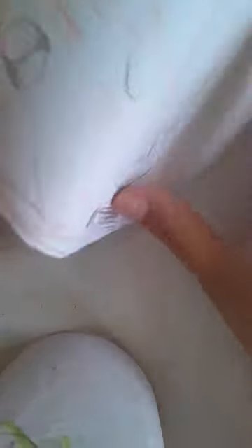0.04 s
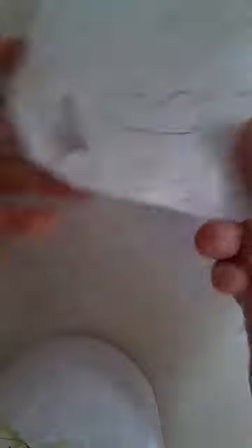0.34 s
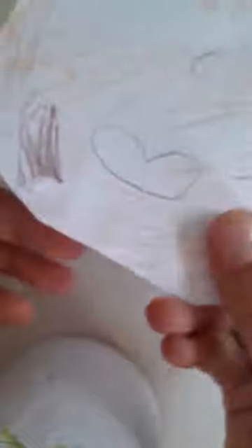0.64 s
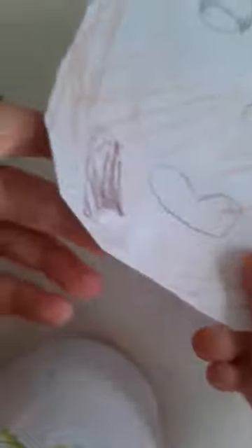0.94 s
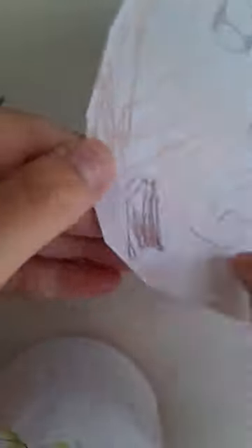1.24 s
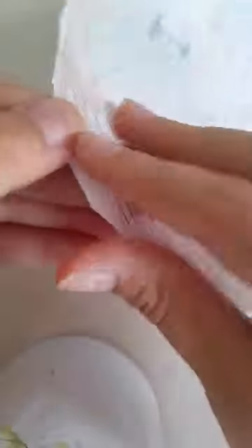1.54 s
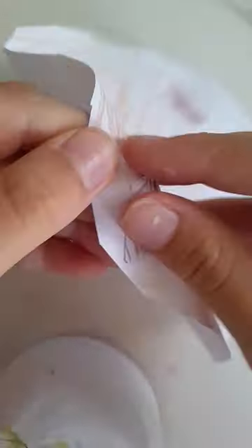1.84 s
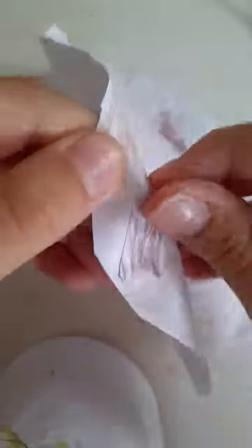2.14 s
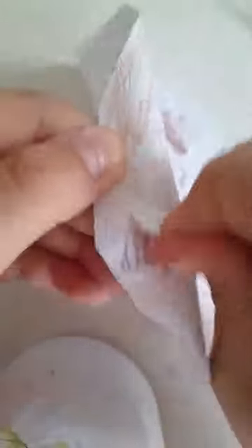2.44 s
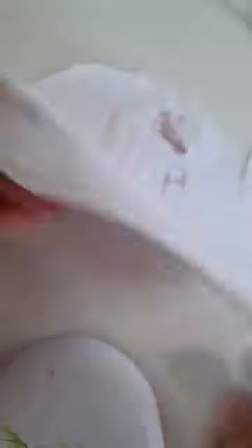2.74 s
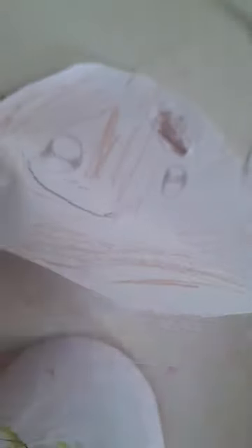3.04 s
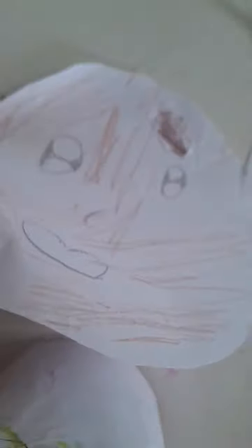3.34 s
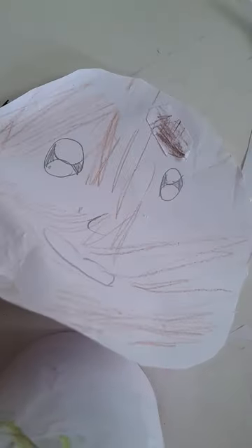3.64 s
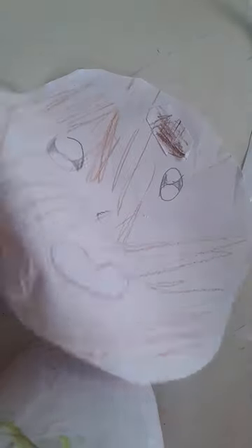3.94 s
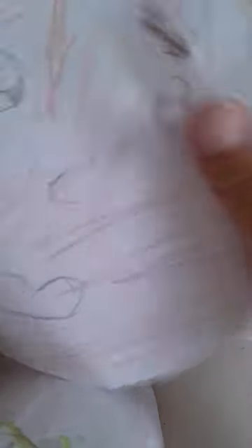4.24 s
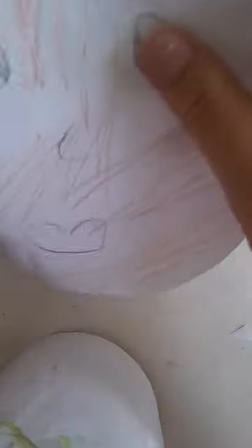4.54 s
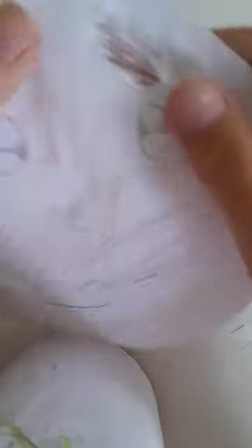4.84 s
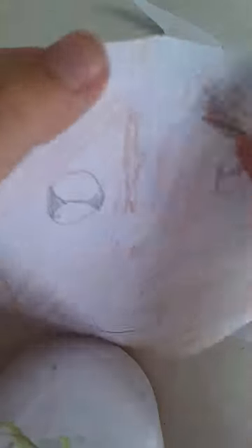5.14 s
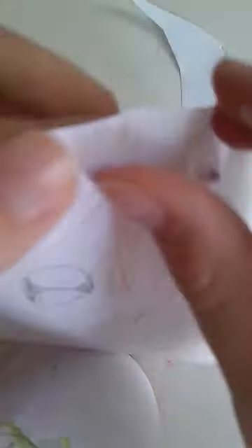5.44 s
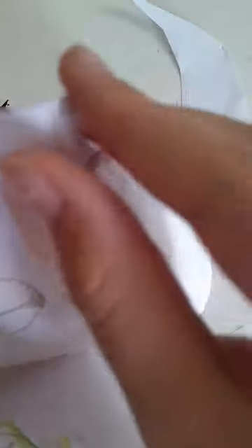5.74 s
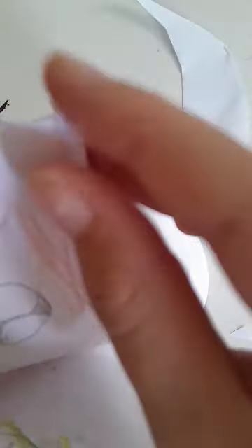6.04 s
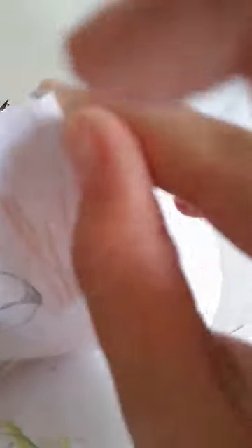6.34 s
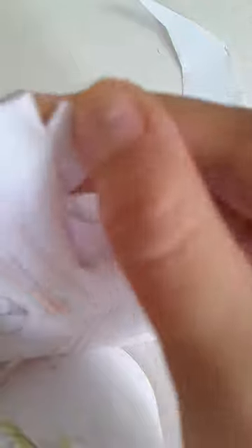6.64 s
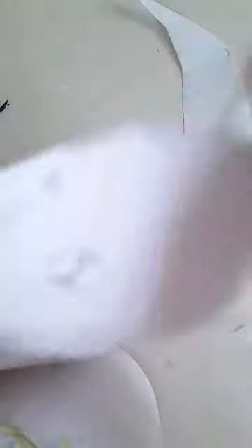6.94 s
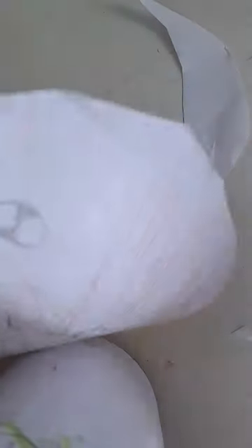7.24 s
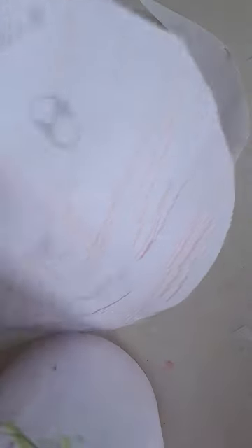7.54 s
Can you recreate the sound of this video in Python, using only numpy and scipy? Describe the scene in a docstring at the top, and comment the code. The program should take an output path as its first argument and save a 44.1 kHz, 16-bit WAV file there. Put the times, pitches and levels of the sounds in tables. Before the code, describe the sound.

A sheet of paper is handled and torn by hand, close to the microphone in a small room. It opens with a flurry of dry rustles, snaps and a small hollow pop, then goes nearly quiet from about 0.5 to 1.1 seconds. Softer rubbing and scattered crackles follow, building to a short, sharp rip at about 2.8 seconds. Only faint ticks and rustles remain until around 3.9 seconds, when a dense stretch of creasing and snapping begins, with a low puff of fanned air at 4.5 and a quick rip at 4.9. The handling eases off by 6 seconds. A hollow pop comes at 6.5 and another sharp rip at 7, followed by light rustles that fade just before 8 seconds. Soft puffs of air accompany the moving sheet, and a faint electrical hum and hiss lie underneath throughout.

```python
"""A dry rustle and a flurry of snaps, close up: drawing paper is turned, creased and torn by hand over
a table in a small room. Fingers and paper edges drag over the fibres in strokes, the fastest of them
short rips. The sheet buckles with snaps and two hollow pops, and fans soft puffs of air at the
microphone. A faint mains hum and hiss lie underneath."""
import sys
import numpy as np
from scipy import signal
from scipy.fft import rfft, irfft
from scipy.io import wavfile
from scipy.ndimage import uniform_filter1d

SR = 44100
rng = np.random.default_rng(int(sys.argv[2]) if len(sys.argv) > 2 else 0)


def dump(signal):
    """Clip the signal to [-1, 1] and save it as 16-bit WAV at the path in sys.argv[1]."""
    limited = np.clip(np.atleast_2d(signal).T, -1, 1)
    pcm = np.round(limited * 32767).astype(np.int16)
    wavfile.write(sys.argv[1], SR, pcm)


N = 343980
TAPS = 4096
TIME = np.arange(N) / SR
HZ = np.maximum(np.arange(TAPS // 2 + 1) * SR / TAPS, 1)

# Tone curves. Each row: frequency in Hz, relative gain in dB.
FLOOR_EQ = [(12, -32.5), (25, -20.5), (45, 4.5), (90, -11.5), (170, -14.5), (300, -21), (650, -22.5),
            (1200, -30), (4000, -30), (9000, -43), (15000, -32.5)]  # room rumble and microphone hiss
WALL_EQ = [(60, -5.5), (300, 4), (1400, -5), (3000, 1), (6000, -8), (15000, -7.5)]  # what the walls give back
PUFF_EQ = [(12, -40.5), (25, -18), (38, -1), (60, -4), (95, 1), (150, -8), (250, -14.5), (500, -24),
           (1500, -76.5)]  # fanned air
FIBRE_EQ = [(900, -17.5), (2000, -4.5), (3200, -2.5), (5200, -1.5), (7500, -2.5), (10000, -3.5),
            (13500, -2.5), (16000, -7)]  # the hiss of slipping fibres
SLACK_BODY_EQ = [(60, -18.5), (240, 3.5), (480, -5.5), (660, 2), (880, -8.5), (1450, 2), (2100, -13),
                 (2600, -6), (4000, -16.5), (7000, -31.5)]  # the sheet hanging loose
TAUT_BODY_EQ = [(60, -17.5), (200, -9), (350, -4.5), (500, -10), (700, -3.5), (1500, -1.5), (2100, 8.5),
                (3000, -3.5), (4200, -7), (7000, -15)]  # the sheet under a stroke
# The mains hum. Each row: frequency in Hz, rms level in dB.
HUM_PARTIALS = [(119.8, -75), (239.6, -89)]
# The microphone's two ports hear the paper differently. Each row: frequency in Hz, left over right in dB.
PORT_BALANCE = [(150, 0.5), (480, -9.5), (1000, -2.5), (2000, 0.5), (4000, 1.5), (8000, -0.5), (13000, -3)]
# Steady peaks and a dip colouring the paper sounds. Each row: centre in Hz, width in Hz, gain in dB.
FIXED_COLOUR = [(640, 31, 5.5), (1065, 510, 5), (1504, 390, 9.5), (2070, 280, -8.5), (2480, 220, 3.5)]
# The sheet swings and fans air. Each row: peak time in seconds, fall in seconds, level in dB.
SWINGS = [(0.126, 0.036, -37.5), (0.213, 0.05, -38.5), (0.33, 0.04, -40.5), (0.384, 0.097, -43.5),
          (0.86, 0.066, -60), (1.234, 0.11, -45.5), (1.455, 0.23, -53.5), (1.76, 0.057, -59),
          (2.3, 0.11, -59), (2.623, 0.039, -46.5), (2.8, 0.13, -52.5), (4.0, 0.049, -56),
          (4.21, 0.019, -53.5), (4.284, 0.17, -42.5), (4.541, 0.051, -29.5), (4.76, 0.055, -41),
          (4.89, 0.12, -43), (5.06, 0.2, -54), (5.24, 0.074, -50), (5.34, 0.05, -45), (5.58, 0.091, -51),
          (5.815, 0.054, -51), (7.001, 0.14, -50), (7.631, 0.082, -49.5)]
# Fingers hold and shift the sheet. Each row: start and end in seconds, hiss level in dB,
# body over hiss in dB.
FINGER_HOLDS = [(0.0, 0.387, -55.5, -9.5), (1.11, 1.333, -72, -5), (1.459, 1.982, -67.5, -4.5),
                (2.052, 2.878, -65.5, -12), (3.286, 3.36, -70.5, -5.5), (3.54, 3.736, -83, 0),
                (3.953, 4.58, -62, -7), (4.742, 5.859, -66.5, -0.5), (6.014, 6.686, -72, -5.5),
                (6.94, 7.243, -64.5, -6), (7.565, 7.796, -74.5, -2)]
# A bulge flips through. Each row: start in seconds, starting level of each mode in dB,
# lower mode in Hz, pan in dB (left over right).
BULGE_POPS = [(0.0677, -34, 1950, 13), (6.5335, -22.5, 1103, 14.5)]
# The sheet buckles or is tapped. Each row: start in seconds, 60 dB decay in seconds, low, middle and
# top levels in dB (as if the energy were packed into 1 ms), ring in Hz, pan in dB (left over right).
BUCKLES = [(0.0663, 0.011, -50.5, -24, -52, 2150, -1.5), (0.113, 0.091, -43, -33, -49, 790, 3.5),
           (0.1676, 0.076, -32.5, -43, -49, 1050, 10), (0.1863, 0.026, -39, -33.5, -29, 1350, 10),
           (0.2448, 0.032, -42, -67, -38, 900, 16), (0.3063, .04, -32.5, -40, -39, 1030, 22),
           (0.3297, 0.013, -33, -32.5, -26.5, 3130, 17), (0.3763, 0.011, -24, -27, -32.5, 1290, 19),
           (0.392, 0.023, -44, -38, -44, 705, 15), (0.4218, 0.04, -32.5, -37.5, -55, 1580, 16),
           (0.817, 0.063, -38.5, -56, -93, 840, 23), (1.1258, 0.054, -39.5, -43, -77, 1430, 23),
           (1.1724, 0.032, -60, -57, -81, 1480, 20), (1.2258, 0.066, -45.5, -40.5, -57, 396, 10),
           (1.4405, 0.023, -34.5, -38, -43, 1400, 6), (1.4452, 0.038, -34.5, -28, -36.5, 1360, 12),
           (1.4882, 0.18, -38.5, -40, -34.5, 1350, 12), (1.7034, 0.078, -65, -41, -30, 2900, 19),
           (1.723, 0.038, -46, -31.5, -49, 795, 15), (1.859, .021, -51, -38.5, -48.5, 3420, 8),
           (2.055, 0.15, -42, -44, -31.5, 387, 2.5), (2.1137, 0.032, -39, -22, -26, 352, 2.5),
           (2.1207, 0.036, -32.5, -29, -25, 1610, -1.5), (2.409, 0.0045, -45, -70, -62, 350, -10),
           (2.7818, 0.025, -35, -24, -12, 3040, 14), (2.797, 0.031, -28, -33, -15, 5470, 1),
           (2.8028, .013, -41, -24, -22.5, 5660, 17), (2.8807, 0.023, -45.5, -31, -40.5, 1320, -5),
           (2.9777, 0.026, -51.5, -40.5, -61.5, 1520, 1), (3.285, 0.049, -54.5, -43, -50.5, 2610, 3),
           (3.556, 0.1, -47.5, -51, -75.5, 620, 4), (3.5836, 0.033, -66, -78, -49.5, 680, 7.5),
           (3.6382, 0.076, -53.5, -52, -85, 594, 3), (3.7289, 0.16, -53, -50, -87.5, 600, 1.5),
           (3.82, 0.11, -64.5, -59.5, -80, 622, -4.5), (4.0822, 0.019, -36, -28, -24, 2200, 8),
           (4.189, 0.023, -41, -30.5, -21, 1430, 16), (4.201, 0.014, -57, -30, -25.5, 1440, -2),
           (4.2399, .068, -35, -28, -21, 1580, 5.5), (4.256, 0.071, -55, -29, -24, 4600, 4),
           (4.3174, 0.077, -30, -31, -39, 1280, 23), (4.334, 0.039, -34, -30, -26.5, 613, 6),
           (4.4326, 0.02, -35.5, -45, -38.5, 1510, 18), (4.483, 0.076, -41, -48, -43, 2420, 10),
           (4.5064, 0.02, -34, -37.5, -33.5, 352, 17), (4.532, 0.075, -21.5, -29.5, -26.5, 1640, 7.5),
           (4.5393, 0.051, -41, -28, -43, 1600, 11), (4.6978, 0.064, -47, -57, -50.5, 640, 5.5),
           (4.7478, 0.048, -28.5, -37.5, -36.5, 1850, 4), (4.7984, 0.08, -35.5, -37.5, -32.5, 1450, 5),
           (4.8505, .022, -43, -34, -31.5, 1320, 8), (4.895, 0.098, -41, -22, -18.5, 2550, 14.5),
           (4.909, 0.084, -49, -20.5, -24.5, 3700, 2), (5.0436, .036, -32, -36, -33.5, 1450, 10),
           (5.17, 0.08, -41, -47, -40, 1720, 7), (5.2484, 0.006, -57, -51.5, -41.5, 340, 10),
           (5.294, 0.033, -45, -49, -80, 1440, 9), (5.339, 0.042, -43, -49, -36.5, 1520, 9),
           (5.3566, .038, -35, -28, -43, 1310, 3), (5.6016, 0.028, -33.5, -38.5, -36.5, 650, 7.5),
           (5.6757, 0.021, -40.5, -36.5, -55, 1480, 2.5), (5.7487, 0.057, -30, -38, -42, 1456, 10),
           (5.8026, .059, -42, -45.5, -59, 1390, 16), (6.0481, 0.075, -52, -55, -44, 490, 6),
           (6.159, 0.078, -54, -50.5, -35.5, 1544, 5), (6.3526, 0.057, -72.5, -89, -41, 1320, 4),
           (6.5319, .019, -30.5, -25.5, -28, 1265, 10), (6.8829, .023, -60, -52.5, -47.5, 600, 6.5),
           (6.984, 0.0092, -21.5, -20, -12, 1680, 5), (7.1103, 0.026, -44, -26.5, -42, 1500, -3.5),
           (7.5237, 0.02, -53, -54, -88, 774, 8), (7.632, 0.032, -43, -32, -49, 1400, 7)]
# Slides and rips. Each row: fastest moment, rise and fall in seconds, hiss level in dB,
# body over hiss in dB, ring of the stretched paper in Hz, pan in dB (left over right).
SLIDES_AND_RIPS = [(0.01, 0.041, 0.058, -42.5, -13, 1700, 5.5), (0.085, 0.02, .022, -46, 8, 1200, 4),
                   (0.103, 0.055, 0.019, -35, -31, 4100, 3.5), (0.174, 0.023, .044, -45.5, 0, 1040, 2.5),
                   (0.205, .02, 0.017, -43.5, 1, 1280, 6), (0.294, 0.02, 0.015, -45, -3.5, 1030, 16),
                   (0.327, 0.019, .02, -41, -10, 3140, 8), (0.373, 0.05, 0.023, -49.5, -1, 1360, 1),
                   (1.231, 0.012, 0.088, -53, 0, 1520, 6.5), (1.499, 0.058, 0.043, -67, 11, 1420, -7),
                   (1.604, 0.054, 0.022, -49.5, -5, 1080, 6), (1.727, 0.056, 0.062, -41, -11, 1140, 2.5),
                   (1.805, 0.017, .052, -47, -7.5, 2700, 3), (1.942, 0.058, 0.051, -45.5, -3.5, 3400, 0),
                   (2.067, 0.055, 0.12, -53.5, -8.5, 3940, 5), (2.27, 0.16, 0.075, -56.5, -1, 1500, -1.5),
                   (2.385, 0.04, 0.087, -50, -10, 4180, 4), (2.595, 0.032, 0.078, -40, -10.5, 5830, 5),
                   (2.63, 0.054, 0.074, -42, -10, 5725, 3.5), (2.769, 0.052, 0.068, -34.5, -9, 2860, 5),
                   (2.787, 0.013, .029, -24, -10, 2940, 1), (3.929, 0.015, 0.12, -51, 1.5, 1600, -1),
                   (4.009, 0.055, 0.084, -42, -3, 1630, 3), (4.159, 0.096, 0.1, -45.5, 7, 1520, 4),
                   (4.277, 0.025, 0.014, -33.5, 2, 1410, 8), (4.338, 0.045, 0.045, -49, 12, 1320, 5.5),
                   (4.4, 0.033, 0.032, -49.5, 3.5, 1450, 3.5), (4.432, 0.016, .011, -43, -4, 1520, 5),
                   (4.54, 0.031, 0.022, -43, 5.5, 1640, 0.5), (4.775, .006, 0.018, -41, -8, 1330, 2),
                   (4.906, 0.027, 0.049, -28, -8, 2980, 6.5), (4.976, 0.015, 0.022, -33.5, -17, 4600, 5.5),
                   (5.057, 0.066, 0.15, -48.5, -10, 1470, 6), (5.5, .061, 0.092, -55.5, 9.5, 1440, 2.5),
                   (5.551, 0.053, 0.043, -49, 4.5, 1080, 3), (5.81, 0.097, 0.08, -60, 4, 1400, 4),
                   (6.168, 0.036, 0.095, -60.5, 6.5, 1520, 5), (6.411, 0.056, 0.028, -74.5, 9.5, 1540, 21),
                   (6.505, 0.013, 0.035, -52, -9, 1610, 3), (6.63, 0.18, 0.11, -68.5, 10, 1450, 4),
                   (6.961, 0.042, 0.046, -22, -10, 5030, 3.5), (6.981, .022, 0.031, -34, 8.5, 1660, -1.5),
                   (7.102, 0.036, 0.018, -46.5, -1.5, 1530, 2), (7.23, 0.13, 0.038, -58.5, -4.5, 1510, -4),
                   (7.496, 0.038, 0.046, -62.5, -9.5, 1420, 0.5),
                   (7.59, 0.025, 0.041, -47.5, -17, 3700, 2.5), (7.63, 0.028, 0.023, -42.5, -10.5, 1440, 3),
                   (7.691, 0.1, .14, -56.5, -7, 1330, 3)]

LEFT_LEAD_S = 0.00025  # direct sound reaches the left port first


def from_db(db):
    """Decibels to gain."""
    return 10 ** (np.asarray(db) / 20)


def unit_rms(x):
    """Scale to rms 1."""
    return x / np.sqrt(np.mean(x ** 2) + 1e-20)


def curve_db(points):
    """An EQ curve in dB, its points joined on a log-frequency axis."""
    hz, db = np.transpose(points)
    return np.interp(np.log(HZ), np.log(hz), db)


def equalise(x, db):
    """Minimum-phase EQ with the given gain at each frequency."""
    cepstrum = irfft(np.log(from_db(db)))
    cepstrum[1:TAPS // 2] *= 2
    cepstrum[TAPS // 2 + 1:] = 0
    impulse = irfft(np.exp(rfft(cepstrum)))
    return signal.fftconvolve(x, impulse[None], axes=1)[:, :x.shape[1]]


def drift(per_s, size):
    """A random wobble with a spread near 1."""
    knots = rng.standard_normal(size // 8 + 2)
    return np.interp(np.arange(size) * per_s / SR, np.arange(len(knots)), knots)


def swell_db(t, rise, fall):
    """A gesture's envelope: it peaks at t = 0 and is 20 dB down at its rise and fall times."""
    return -20 * np.abs(t / np.where(t < 0, rise, fall)) ** 1.36


def mix_in(out, start_s, sound):
    """Lay a sound on the track at its cue."""
    start = round(start_s * SR)
    low, high = max(start, 0), min(start + sound.shape[1], N)
    out[:, low:high] += sound[:, low - start:high - start]


def panned(x, pan_db):
    """Constant-power pan; positive leans left."""
    return x * unit_rms(from_db([[pan_db / 2], [-pan_db / 2]]))


def two_ports(direct, scattered, direct_share):
    """Stereo image: direct sound reaches the right port late; scattered sound differs at each port."""
    samples = np.arange(len(direct))
    lag = np.round(LEFT_LEAD_S * SR + rng.normal(0, 1.4))
    late = np.interp(samples - lag, samples, direct, left=0)
    return np.sqrt(direct_share) * np.array([direct, late]) + np.sqrt(1 - direct_share) * scattered


def background(floor_db=-71):
    """The bed: quiet room rumble, microphone hiss and a slightly wavering mains hum."""
    noise = rng.standard_normal((3, N))
    floor = from_db(floor_db) * unit_rms(equalise(noise[0] + 4.5 * noise[1:], curve_db(FLOOR_EQ)))
    hum = np.zeros(N)
    for hz, db in HUM_PARTIALS:
        amplitude = np.sqrt(2) * from_db(db + 1.5 * drift(5, N))
        hum += amplitude * np.sin(2 * np.pi * hz * TIME + 0.3 * drift(2, N))
    return floor + panned(hum, pan_db=3.5)


def room(x, early_t60_s=0.1, tail_t60_s=0.34, return_db=-12.5):
    """Small-room reverb: a quick wash of reflections from table and walls, then a short tail."""
    t = np.arange(SR) / SR
    decay = from_db(-60 * t / tail_t60_s) + 2.9 * from_db(-60 * t / early_t60_s)
    reflections = unit_rms(rng.standard_normal((2, SR)) * decay * (t > 0.006)) / np.sqrt(SR)
    impulse = equalise(reflections, curve_db(WALL_EQ))
    send = x + 0.41 * x[::-1]  # each side bleeds into the other
    return from_db(return_db) * signal.fftconvolve(send, impulse, axes=1)[:, :N]


def fanned_air(rubbing_db, sway_db=-3, rise_s=0.038):
    """The held sheet stirs the air, and each swing pushes a soft low puff, mostly at the left port."""
    noise = rng.standard_normal((3, N))
    wind = equalise(noise[0] + 0.85 * noise[1:], curve_db(PUFF_EQ))
    wind /= np.sqrt(uniform_filter1d(np.mean(wind ** 2, axis=0), size=2000) + 1e-9)  # even out its level
    power = from_db(rubbing_db + sway_db)[None] ** 2
    t = np.arange(-SR // 5, SR // 2) / SR
    for peak_s, fall_s, db in SWINGS:
        puff = from_db(db + swell_db(t, rise_s, fall_s))
        mix_in(power, peak_s + t[0], puff[None] ** 2)
    return panned(wind * np.sqrt(power), pan_db=8.0)


def fixed_colour_eq():
    """Steady peaks and a dip that colour the paper sounds, strongest near 1.5 kHz, in dB."""
    return sum(db / (1 + (2 * (HZ - hz) / width) ** 2) for hz, width, db in FIXED_COLOUR)


def grip_eq(ring_hz, ring_db):
    """The broad ring of the gripped patch of paper, in dB, with small peaks that change at every bend."""
    ring = ring_db / (1 + (np.log2(HZ / ring_hz) / 0.3) ** 2)
    ripple_hz = np.geomspace(150, 17000, 110)
    ripple = 1.6 * np.interp(HZ, ripple_hz, rng.standard_normal(len(ripple_hz)))
    return ring + ripple


def fibre_slips(size, per_s, spread_db, smooth):
    """Fibres catch and let go: tiny clicks of uneven size over a smooth rub."""
    strengths = from_db(spread_db * np.minimum(rng.exponential(1, (3, size)), 4))
    signs = rng.choice([-1, 1], (3, size))
    clicks = unit_rms(strengths * signs * (rng.random((3, size)) < per_s / SR))
    return unit_rms(clicks + smooth * rng.standard_normal((3, size)))


def friction(slips, hiss_db, body_db, body_eq, grip_db, judder_db):
    """Slips hiss directly and shake the body of the sheet; the contact judders as it moves."""
    size = slips.shape[1]
    slips = slips * from_db(judder_db * (drift(200, size) + drift(700, size)))
    hiss = two_ports(slips[0], slips[1:], direct_share=0.13)
    hiss = equalise(hiss, curve_db(FIBRE_EQ) + grip_db)
    body = two_ports(slips[0], slips[1:], direct_share=0.62)
    body = equalise(body, curve_db(body_eq) + fixed_colour_eq() + grip_db)
    return from_db(hiss_db) * (unit_rms(hiss) + from_db(body_db) * unit_rms(body))


def hold_envelopes(resting_db=-81.5, grab_s=0.035, let_go_s=0.057):
    """Rubbing level and body over rubbing, in dB; each hold fades 20 dB per grab or let-go time."""
    hiss = body = from_db(resting_db)
    for start, end, hiss_db, body_db in FINGER_HOLDS:
        fade = np.maximum(start - TIME, 0) / grab_s + np.maximum(TIME - end, 0) / let_go_s
        level = from_db(hiss_db - 20 * np.minimum(fade, 10))
        hiss = hiss + level
        body = body + level * from_db(body_db)
    return 20 * np.log10(hiss), 20 * np.log10(body / hiss)


def rustle(hiss_db, body_db):
    """The slack sheet creeps softly under the fingers, with sparser slips than in a stroke."""
    creep = from_db(1.5 * drift(25, N))
    slips = creep * fibre_slips(N, per_s=1500, spread_db=1.0, smooth=1.0)
    rub = friction(slips, hiss_db, body_db, SLACK_BODY_EQ, grip_db=0, judder_db=1.2)
    return panned(rub, pan_db=3.5)


def pops(upper_ratio=1.17, t60_s=0.013):
    """A bulge flips through with a hollow knock, ringing for a moment in two close modes."""
    out = np.zeros((2, N))
    t = np.maximum(np.arange(TAPS) / SR - [[0], [LEFT_LEAD_S]], 0)
    for start, db, hz, pan_db in BULGE_POPS:
        modes = np.sin(2 * np.pi * hz * t) + np.sin(2 * np.pi * hz * upper_ratio * t)
        mix_in(out, start, panned(modes * from_db(db - 60 * t / t60_s), pan_db))
    return out


def snap(t60_s, levels_db, grip_db):
    """A buckle gives a crack of a few milliseconds, then bending waves scatter across the sheet."""
    t = np.arange(TAPS) / SR
    noise = rng.standard_normal((3, TAPS))
    dark = signal.sosfilt(signal.butter(1, 2500, fs=SR, output="sos"), noise)
    bright = noise - dark
    crack = rng.standard_normal(TAPS) * np.exp(-np.abs(t - 0.002) / 0.00057)
    waves = dark * from_db(-60 * t / t60_s) + bright * from_db(-60 * t / (1.1 * t60_s))
    scatter = unit_rms(waves * (1 - np.exp(-t / 0.0013)))
    stereo = two_ports(unit_rms(crack) + scatter[0], 1.54 * scatter[1:], direct_share=0.63)
    low, middle, top = levels_db - 10 * np.log10([900, 2800, 11500])  # spread over band widths in Hz
    sheen = top - 6.5 + 0.35 * min(top - middle, 0)
    tone = [(30, low - 25), (180, low - 1.5), (650, low), (2100, middle), (6500, top), (16000, sheen)]
    sound = equalise(stereo, curve_db(tone) + fixed_colour_eq() / 2 + grip_db)
    energy = np.sum(from_db(levels_db) ** 2) * SR / 1000
    return unit_rms(sound) * np.sqrt(energy / TAPS)


def snaps(cues):
    """Dry buckles and taps, each with its own ring and pan; cues are laid out like BUCKLES."""
    out = np.zeros((2, N))
    for start, t60_s, *levels_db, ring_hz, pan_db in cues:
        sound = snap(t60_s, np.array(levels_db), grip_eq(ring_hz, ring_db=8.0))
        mix_in(out, start, panned(sound, pan_db))
    return out


def crinkles(per_s=3.1, over_rub_db=13, spread_db=6.5, t60_s=0.021, ring_hz=1400, pan_db=5):
    """Tiny buckles sprinkled at random through each hold, louder where the rubbing is louder."""
    cues = []
    for start, end, hiss_db, body_db in FINGER_HOLDS:
        typical_db = hiss_db + over_rub_db + np.array([body_db, body_db, 0])
        for at_s in rng.uniform(start, end, round((end - start) * per_s)):
            levels_db = typical_db + spread_db * rng.standard_normal(3)
            cues.append((at_s, t60_s, *levels_db, ring_hz, pan_db))
    return snaps(cues)


def strokes():
    """Slides and rips: a dense spray of fibre slips swells to the fastest moment and dies away."""
    out = np.zeros((2, N))
    t = np.arange(-SR // 5, SR // 4) / SR
    for peak_s, rise_s, fall_s, hiss_db, body_db, ring_hz, pan_db in SLIDES_AND_RIPS:
        slips = fibre_slips(len(t), per_s=6000, spread_db=3.0, smooth=0.53)
        level_db = hiss_db + swell_db(t, rise_s, fall_s)
        grip_db = grip_eq(ring_hz, ring_db=2.5)
        sound = friction(slips, level_db, body_db, TAUT_BODY_EQ, grip_db, judder_db=2.0)
        mix_in(out, peak_s + t[0], panned(sound, pan_db))
    return out


def scene():
    """The mix: paper up front, coloured by each port, over its reverb, the fanned air and the bed."""
    rubbing_db, body_db = hold_envelopes()
    air = fanned_air(rubbing_db) + background()
    left, right = strokes() + rustle(rubbing_db, body_db) + snaps(BUCKLES) + crinkles() + pops()
    balance_db = curve_db(PORT_BALANCE)
    paper = np.vstack([equalise(left[None], balance_db / 3), equalise(right[None], -balance_db * 2 / 3)])
    return paper + room(paper) + air


def record(dry):
    """The small microphone loses the deepest bass; the top is cut steeply."""
    low_cut_hz, high_cut_hz = 38, 15800
    thin = signal.sosfilt(signal.butter(4, low_cut_hz, "high", fs=SR, output="sos"), dry)
    return signal.sosfilt(signal.ellip(10, 0.2, 75, high_cut_hz, fs=SR, output="sos"), thin)


dry = scene()
out = record(dry)
dump(out)
```